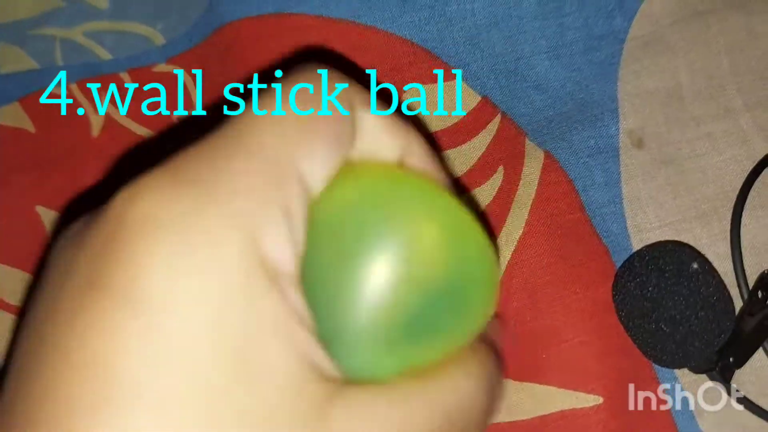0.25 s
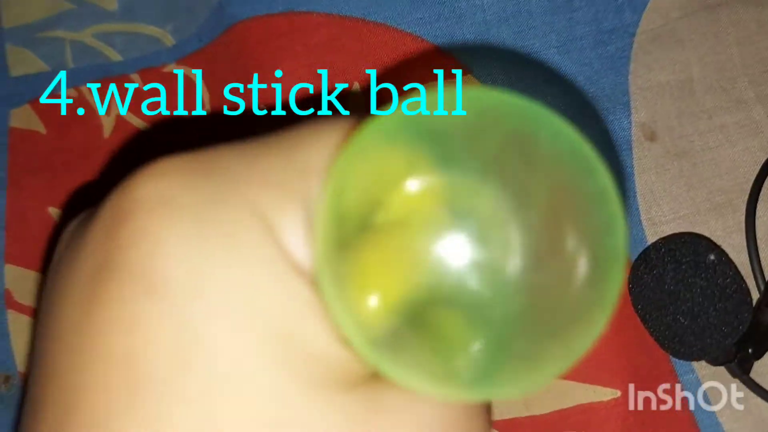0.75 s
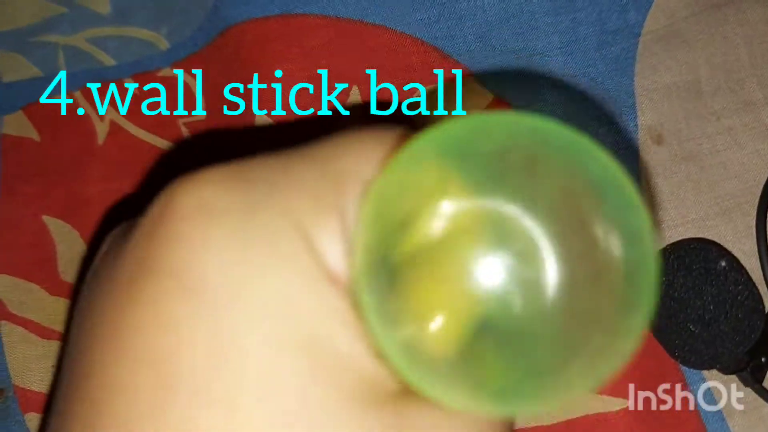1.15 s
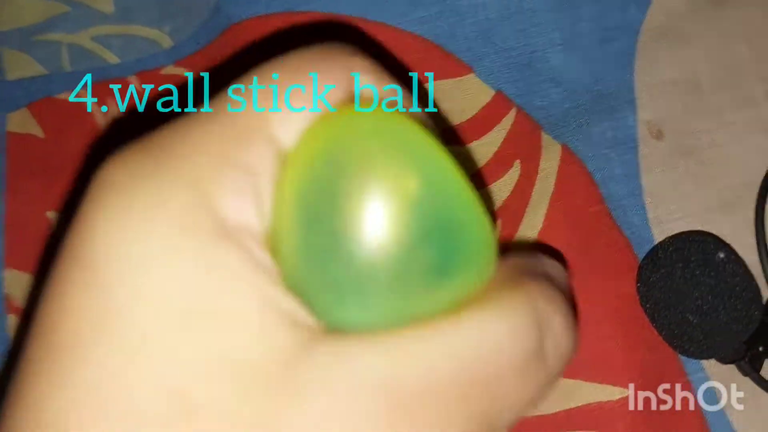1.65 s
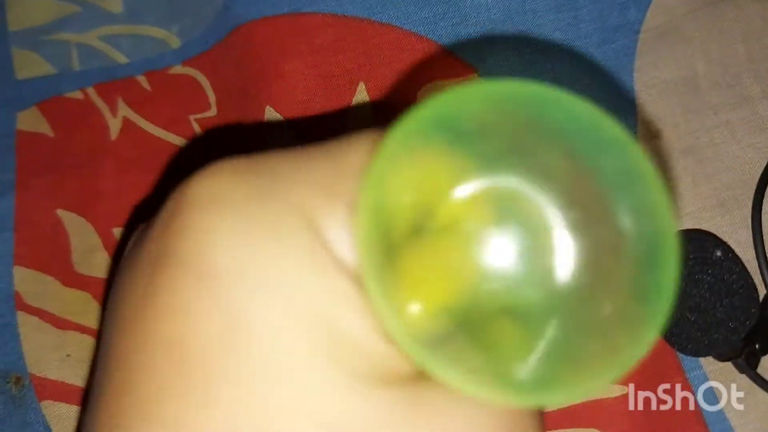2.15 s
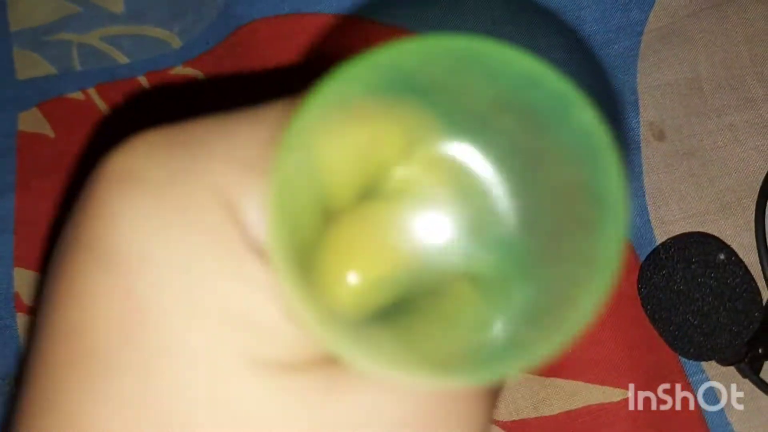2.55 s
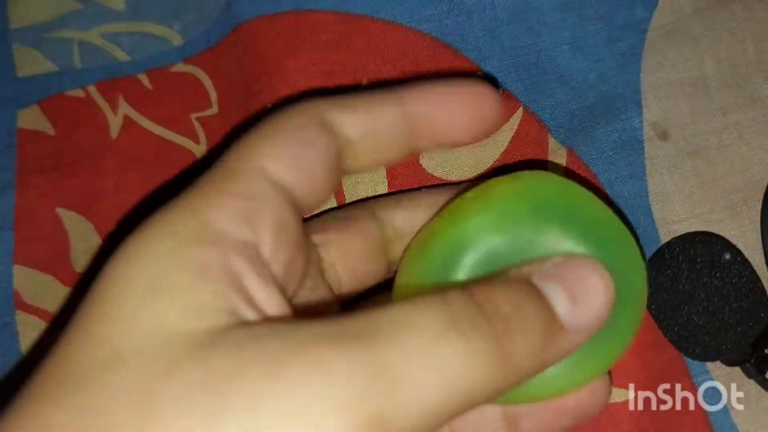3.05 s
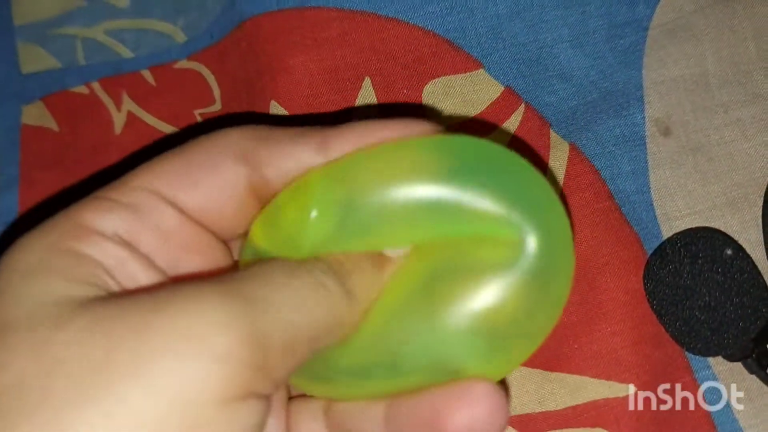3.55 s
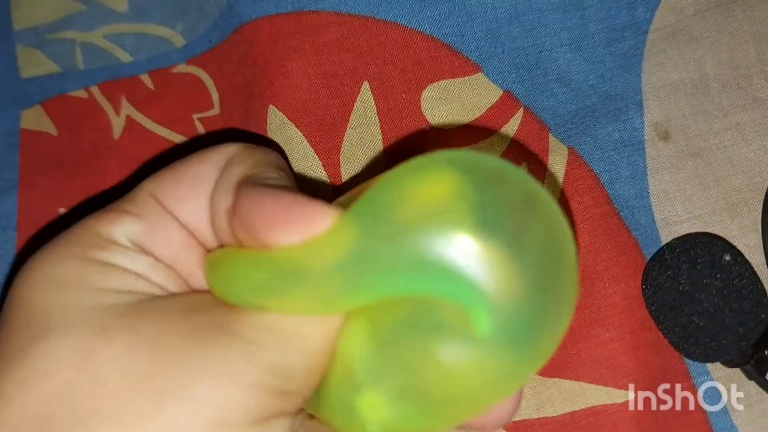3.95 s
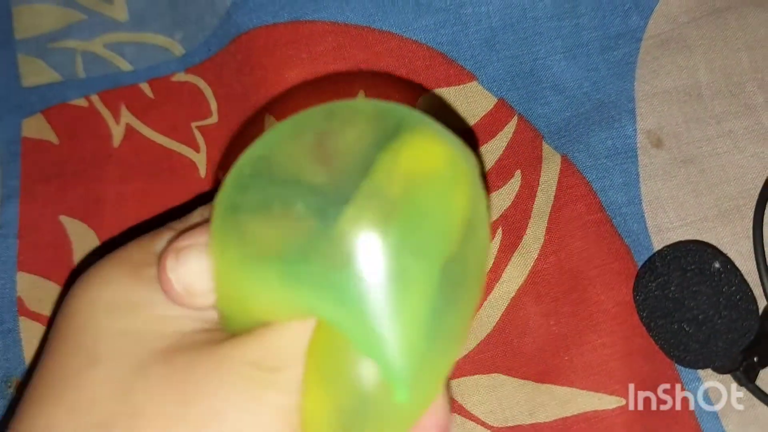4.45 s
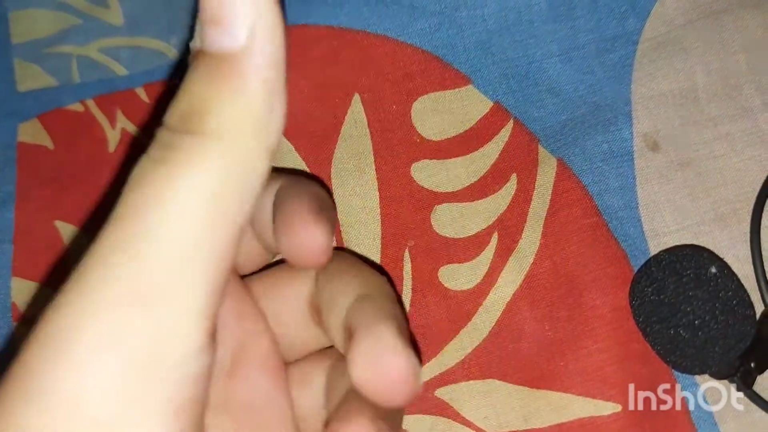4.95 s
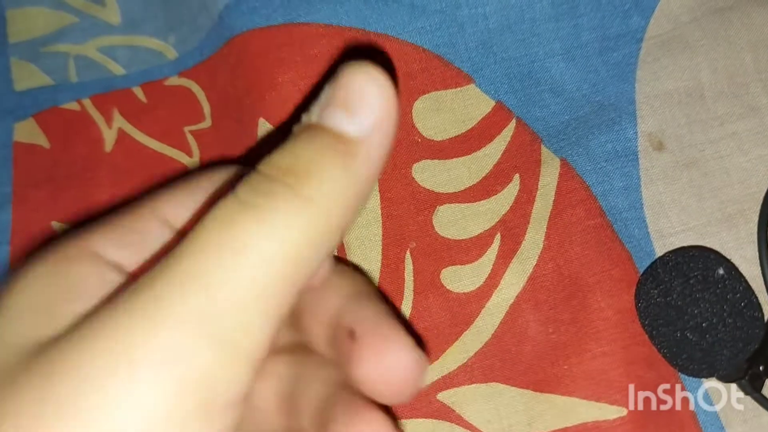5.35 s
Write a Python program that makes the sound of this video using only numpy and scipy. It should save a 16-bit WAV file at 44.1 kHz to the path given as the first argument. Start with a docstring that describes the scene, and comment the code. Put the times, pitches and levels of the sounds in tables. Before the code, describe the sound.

A low, quiet rumble runs throughout, indoors, with a small microphone very close and hardly any echo. From 0 to 2.8 s a fist kneads a sticky gel ball. Rubber brushes and squeals on the palm, loudest around 0.3 to 0.5 s, and tacky skin peels away in tight clusters of sharp snaps with hollow, sinking air pops near 0.3, 0.6, 0.95, 1.34, 1.7, 2.03, 2.36 and 2.72 s. Short high squeaks lead some of them, clearest at 1.66 and 2.01 s, amid fine crackle and squelch. Around 3 s two dull bumps nudge the bed, and a soft low hum swells at 3.5 s. It stays nearly still, with faint sticky ticks at 4.12 and 4.55 s. At 4.87 to 4.9 s the ball hits the sheet with a slap and a boomy thud, then bounces more softly and dully at 5.13 s, leaving only rumble until about 5.6 s.

```python
"""A low rumble and a brush of rubber on the palm open the scene: a fist works a sticky gel ball near a small mic.
Then the tacky skin peels off the fingers in snaps: a jerk rings the skin, a trapped air pocket pops with a sinking tone.
Rubbing is filtered noise, squeals from slips and resonances, and short squeaks, with crackling tack and squelching gel.
Near the end the ball drops on the bed sheet and bounces: soft pushes ring ball and bed, its skin and air slap.
Before that the hand nudges the bed, and a low hum swells once, over shaped noise for the rumble."""
import sys
import numpy as np
from scipy import signal
from scipy.io import wavfile

SR = 44100
rng = np.random.default_rng(int(sys.argv[2]) if len(sys.argv) > 2 else 0)


def unload_wav(signal):
    """Save mono or channel-first audio to the path in sys.argv[1] as 16-bit WAV at rate SR, clipped to [-1, 1]."""
    wavfile.write(
        sys.argv[1],
        SR,
        np.round(np.clip(np.atleast_2d(signal).T, -1, 1) * 32767).astype(np.int16),
    )


N = 246519


def from_db(db):
    """Decibels to amplitude gain."""
    return 10 ** (np.asarray(db) / 20)


def rms_one(x):
    """Scale to unit rms."""
    return x / np.sqrt(np.mean(x ** 2) + 1e-20)


def in_time(rows):
    """Each column of a curve, joined by straight lines, at every sample."""
    times, *columns = np.transpose(rows)
    return [np.interp(np.arange(N) / SR, times, column) for column in columns]


def drift(rate_hz):
    """Slow random wander of rms 1: noise through two equal low-pass poles, made at every 40th sample."""
    pole = np.exp(-80 * np.pi * rate_hz / SR)
    noise = rng.standard_normal(N // 40 + 2002)
    slow = signal.lfilter([1], [1, -2 * pole, pole * pole], noise)[2000:]   # drop the settling
    return np.interp(np.arange(N) / 40, np.arange(len(slow)), rms_one(slow))


def ring(x, hz, t60):
    """Two-pole resonance: a unit click starts a dying sine of height 1; t60 in seconds."""
    radius = from_db(-60 / (max(t60, 5e-4) * SR))
    angle = 2 * np.pi * hz / SR
    # the tiny offset keeps the filter off denormal numbers
    return signal.lfilter([0, np.sin(angle)], [1, -2 * radius * np.cos(angle), radius * radius], x + 1e-18)


def hump(hz, width_hz):
    """A narrow band of noise: twice through one resonance, rms 1."""
    t60 = np.log(1000) / (np.pi * width_hz)
    return rms_one(ring(ring(rng.standard_normal(N), hz, t60), hz, t60))


def passed(x, hz, kind, order=2):
    """Butterworth filter."""
    return signal.sosfilt(signal.butter(order, hz, kind, fs=SR, output="sos"), x)


# Spectrum of the room rumble, relative: f/Hz, level/dB per Hz
RUMBLE_SPECTRUM = [(15, -48.5), (25, -27.5), (54, 0), (77, 0), (100, -8), (180, -5), (299, -2),
                   (333, -11.5), (371, -16), (412, -7.5), (524, -11.5), (1110, -19), (2600, -34),
                   (3140, -52), (14800, -46.5)]
# Narrow humps in the rumble: f/Hz, width/Hz, relative level/dB
RUMBLE_HUMPS = [(62.6, 16.9, -3.5), (257.5, 40, -10), (304.6, 26, -7)]
# Slow swell of the rumble: t/s, rumble level/dB, level of the humps over it/dB
RUMBLE_SWELL = [(0.0, -45, -7), (0.83, -43.5, -9.5), (1.15, -45, -8), (1.52, -43, -8.5), (2.49, -45, -5.5),
                (2.8, -43, -5.5), (3.02, -42.5, 1), (3.21, -44.5, -6), (3.64, -44.5, -3.5),
                (3.95, -44.5, -9), (5.03, -42.5, -10.5), (5.59, -45, -4.5)]


def rumble():
    """Third-octave bands of noise that swell loosely together, plus a few narrow humps."""
    level_db, humps_db = in_time(RUMBLE_SWELL)
    edges = 22 * 2 ** np.arange(0, 9.5, 1 / 3)
    table_hz, table_db = np.array(RUMBLE_SPECTRUM).T
    white = rng.standard_normal((2, N))   # neighbouring bands use different noise
    together = drift(2.7)
    bands = 0
    for k, (low, high) in enumerate(zip(edges, edges[1:])):
        band_db = np.interp(np.log(low * high) / 2, np.log(table_hz), table_db)
        gain = from_db(band_db + 1.1 * together + 1.3 * drift(14))
        bands = bands + gain * passed(white[k % 2], [low, high], "band", order=3)
    humps = sum(from_db(db) * hump(hz, width) for hz, width, db in RUMBLE_HUMPS)
    bands = passed(passed(bands, 26, "high", order=6), 6600, "low", order=3)
    return from_db(level_db) * (rms_one(bands) + from_db(humps_db) * humps)


HUM_MIDDLE_S, HUM_HALF_S, HUM_HZ, HUM_DB = 3.5, 0.08, 180.5, -45


def hum():
    """A narrow low band of noise swells and fades once under a bell curve."""
    t = np.arange(N) / SR
    swell = np.exp(-((t - HUM_MIDDLE_S) / HUM_HALF_S) ** 2)
    return from_db(HUM_DB) * swell * hump(HUM_HZ, 25)


# The ball meets the sheet: t/s, blow level/dB, softness/ms
DROPS = [(4.862, -31.5, 2.3), (4.872, -27, 2.2), (4.881, -14, 2.7), (4.8936, -11.5, 1.33),
         (4.907, -30, 0.66), (4.918, -24.5, 1), (4.934, -33.5, 1), (5.121, -17.5, 5.5), (5.133, -10.5, 10)]
# The hand nudges the bed: t/s, blow level/dB, softness/ms
NUDGES = [(2.966, -18, 9.4), (3.085, -21, 7.5)]
# Modes of ball and bed: f/Hz, level/dB, t60/s
BED_MODES = [(75, -2, 0.034), (139, 0, 0.022), (265.3, -1.5, 0.078), (433, -3, 0.028), (660, 0.5, 0.044),
             (900, -2.5, 0.019)]
SHUDDER_DB, SHUDDER_S = -18, 0.014   # the gel keeps jolting the sheet after each blow


def drops():
    """Soft bell-shaped pushes, each with a dying shudder, ring the modes of ball and bed."""
    push = np.zeros(N)
    t = np.arange(SR // 10) / SR
    blows = DROPS + NUDGES
    dying = np.exp(-t / SHUDDER_S) / np.sqrt(SHUDDER_S * SR)
    jolts = rng.standard_normal((len(blows), len(t))) * dying
    for (s, blow_db, soft_ms), jolt in zip(blows, jolts):
        shape = np.hanning(max(round(soft_ms * SR / 1000), 4))
        blow = np.convolve((t == 0) + from_db(SHUDDER_DB) * jolt, shape / shape.sum())
        push[round(s * SR):][:len(blow)] += from_db(blow_db) * blow
    modes = 0
    for k, (hz, db, t60) in enumerate(BED_MODES):
        modes = modes + from_db(db) * ring(push, hz, t60) * (-1) ** (k + 1)   # alternate polarity
    return passed(modes, 45, "high")


# Strokes of rubber over the palm: start t/s, length/s, hiss level/dB, low squeal level/dB,
# high squeal level/dB, growth over the stroke/dB
STROKES = [(0.0, 0.0014, -57, -61, -59.5, 5), (0.183, 0.053, -78, -77, -74, -2),
           (0.266, 0.051, -56.5, -72, -59, 12), (0.318, 0.039, -53, -53, -69, 3),
           (0.387, 0.055, -49.5, -50.5, -70, 1.5), (0.463, 0.019, -54, -53.5, -70, -1),
           (0.505, .03, -63, -83, -90, -3), (0.581, 0.037, -63, -71.5, -55, 21),
           (0.921, 0.046, -62.5, -66.5, -62, 10), (0.951, 0.071, -61, -65, -74, -8),
           (1.29, 0.042, -73, -78, -65, -6.5), (1.349, 0.044, -61.5, -66.5, -71.5, -4.5),
           (1.094, 0.027, -89.5, -84, -75.5, 0), (1.417, 0.062, -79, -73, -81, -15),
           (1.675, 0.052, -66.5, -64, -64, 14), (2.011, .007, -64, -85, -61, 7),
           (2.035, 0.019, -60, -64, -55.5, 18), (2.339, 0.038, -64, -67, -62.5, 17),
           (2.404, 0.034, -62, -72, -67.5, -11.5), (2.716, 0.026, -59.5, -68, -58.5, 15.5),
           (2.776, 0.036, -63, -68, -67.5, 4), (2.924, 0.051, -61, -72.5, -69, -3),
           (4.116, 0.021, -68, -91.5, -80.5, 6), (4.135, 0.07, -77, -88, -79.5, 2),
           (4.228, 0.043, -81, -82, -83.5, -1.5), (4.548, .02, -77, -67.5, -83, -3.5),
           (4.877, 0.018, -57, -61, -56.5, 14)]
# The triples below are for hiss, low squeal, high squeal
GROWTH_SHARE = (0.65, 0.4, 0.048)   # how far each follows the growth
RISE_DB_PER_S, FALL_DB_PER_S = (527, 471, 559), (479, 415.5, 693.5)
REST_DB = (-94, -94, -96.5)   # the hand at rest
LINGER_DB, LINGER_DB_PER_S = -15, 110   # a weaker, slower tail


def strokes():
    """Levels in dB of hiss, low and high squeal: each stroke rises, holds while it changes, falls and lingers."""
    t = np.arange(0, N + 32, 32) / SR
    levels = []
    for k in range(3):
        power = from_db(REST_DB[k]) ** 2
        for start, length, *db, growth_db in STROKES:
            early = np.maximum(start - t, 0)
            past = np.maximum(t - start - length, 0)
            held = db[k] + GROWTH_SHARE[k] * growth_db * np.clip((t - start) / length, 0, 1)
            fall = np.maximum(-FALL_DB_PER_S[k] * past, LINGER_DB - LINGER_DB_PER_S * past)
            power = power + from_db(held + fall - RISE_DB_PER_S[k] * early) ** 2
        levels.append(np.interp(np.arange(N) / SR, t, 10 * np.log10(power)))
    return levels


SLIPS_PER_S, SLIP_SPREAD, SLIP_NOISE_DB = 170, .25, -9   # typical rate, its log spread, noise under the slips


def creak(pitches_hz, width_hz):
    """Rubber sticks and slips unevenly; each slip rings one of a few broad resonances over noise; rms 1."""
    rate = SLIPS_PER_S * np.exp(SLIP_SPREAD * drift(60))
    count = np.floor(np.cumsum(rate) / SR)
    slips = np.diff(count, prepend=0) * from_db(3 * rng.standard_normal(N))
    t60 = np.log(1000) / (np.pi * width_hz)
    dealt = rng.integers(0, len(pitches_hz), N)
    rings = sum(ring(ring(slips * (dealt == k), hz, t60), hz, t60) for k, hz in enumerate(pitches_hz))
    noise = hump(np.mean(pitches_hz), width_hz)
    return rms_one(rms_one(rings) + from_db(SLIP_NOISE_DB) * noise)


CRACKLE_PER_S = 740


def crackle():
    """Tiny patches of tack tear at random, each ringing a few cycles; rms 1."""
    sizes = from_db(4 * np.minimum(rng.exponential(1, N), 3)) * rng.choice([-1, 1], N)
    torn = rng.random(N) < CRACKLE_PER_S / SR
    dealt = rng.integers(0, 12, N)
    pitches = np.geomspace(500, 4500, 12)
    rings = sum(ring(sizes * torn * (dealt == k), hz, 6.0 / hz) for k, hz in enumerate(pitches))
    return rms_one(passed(rings, 5100, "low"))


# Short squeaks as the fist starts to open: peak t/s, level/dB, f/Hz
SQUEAKS = [(0.893, -57, 4870), (1.663, -44.5, 5050), (2.011, -47.5, 5200), (2.327, -67, 4960)]
SQUEAK_RISE_DB_PER_S, SQUEAK_FALL_DB_PER_S, SQUEAK_WIDTH_HZ = 1150, 1807.5, 550


def squeaks():
    """Narrow bands of noise with a quick rise and a quicker end."""
    t = np.arange(N) / SR
    out = 0
    for s, db, hz in SQUEAKS:
        rise = SQUEAK_RISE_DB_PER_S * np.maximum(s - t, 0)
        fall = SQUEAK_FALL_DB_PER_S * np.maximum(t - s, 0)
        out = out + from_db(db - rise - fall) * hump(hz, SQUEAK_WIDTH_HZ)
    return out


HISS_LOW_HZ, HISS_HIGH_HZ = 1800, 12600
LOW_SQUEAL_HZ, LOW_SQUEAL_WIDTH_HZ = (3300, 3600, 4050), 750   # pitches a slip may ring at
OVERTONE_HZ, OVERTONE_WIDTH_HZ = 6300, 800
HIGH_SQUEAL = [(5000, 1000), (5800, 1100)]   # f/Hz, width/Hz; each wanders in level on its own
SQUEAL_WANDER_DB, FLUTTER_DB = 3, 2
CRACKLE_DB, SQUELCH_DB = 12.5, 18.5   # over the weaker of the two squeals


def rub():
    """Rubber hisses on skin with two loose, fluttering squeals; tack crackles and gel squelches."""
    hiss_db, low_db, high_db = strokes()

    grains = rng.standard_normal(N) * from_db(2.5 * rng.exponential(1, N))
    hiss = passed(passed(grains, HISS_LOW_HZ, "high"), HISS_HIGH_HZ, "low", order=16)
    hiss = rms_one(passed(hiss, 14000, "low", order=1))
    hiss = from_db(hiss_db - 0.5 * drift(60)) * hiss

    overtone = from_db(-7.0) * hump(OVERTONE_HZ, OVERTONE_WIDTH_HZ)
    low = creak(LOW_SQUEAL_HZ, LOW_SQUEAL_WIDTH_HZ) + overtone
    low = from_db(low_db + FLUTTER_DB * drift(150)) * low

    high = sum(from_db(SQUEAL_WANDER_DB * drift(4.8)) * hump(hz, width) for hz, width in HIGH_SQUEAL)
    high = from_db(high_db + 2.3 * drift(120)) * rms_one(high)

    working = from_db(np.minimum(low_db, high_db))   # both squeals are up while the fist works the ball
    squelch = rms_one(passed(rng.standard_normal(N), [100, 900], "band"))
    squelch = from_db(SQUELCH_DB + 3.0 * drift(32)) * squelch
    tack = from_db(CRACKLE_DB) * crackle()
    return hiss + low + high + squeaks() + working * (tack + squelch)


POCKET_SAG, POCKET_SAG_S = 0.31, .0006   # starts higher by this share, sinks with this time constant
POCKET_ROUGH = 0.33   # depth of the waver in level


def pocket(hz, t60, wobble):
    """A trapped air pocket: a dying tone that sinks in pitch and wavers."""
    t = np.arange(len(wobble)) / SR
    sag = POCKET_SAG * np.exp(-t / POCKET_SAG_S)
    pitch = hz * (1 + sag + 0.092 * POCKET_ROUGH * wobble[::-1])
    tone = np.sin(2 * np.pi * np.cumsum(pitch) / SR) * (1 + POCKET_ROUGH * wobble)
    return passed(tone * from_db(-60 * t / t60), 300, "high")


# Skin snapping off the fingers, and at 4.86 to 4.9 s the ball's skin and air slapping the sheet:
# t/s, pocket f/Hz, pocket level/dB, pocket t60/ms, skin f/Hz, skin level/dB, upper skin ring level/dB,
# treble tick level/dB, top tick level/dB (peaks before the last filters)
SNAPS = [(0.2685, 605, -46, 18, 2700, -42, -37, -50, -56),
         (0.285, 1300, -36, 30, 2420, -41, -23.5, -27, -28),
         (0.297, 1150, -26.5, 14, 3330, -44, -39, -41, -47),
         (0.311, 730, -19, 10.5, 2900, -19, -40, -13, -13),
         (0.5727, 620, -52, 17, 2250, -34, -31, -41, -54),
         (0.5822, 1450, -41, 27, 2630, -35.5, -24, -35, -50),
         (0.6024, 1100, -27, 10, 2700, -45, -55, -63, -66),
         (0.614, 720, -15.5, 11, 2990, -5.5, -8, -13.5, -30),
         (0.6233, 650, -25.5, 22, 3000, -45, -48, -58, -69),
         (0.8924, 970, -53.5, 12, 2050, -35, -44, -66.5, -74),
         (0.9083, 1150, -39, 18, 2550, -32, -33, -54, -52),
         (0.9177, 1530, -39, 29, 2350, -48, -37, -54, -60),
         (0.9202, 1190, -46, 10, 2800, -47, -43, -45, -52.5),
         (0.9278, 1216, -30.5, 42, 2900, -39, -40, -38, -49),
         (0.952, 844, -17, 15, 3220, -7, -21, -10.5, -15),
         (0.962, 660, -28.5, 25, 3270, -40, -47, -47, -49.5),
         (1.331, 1020, -16.5, 11, 2500, -31, -36, -64, -68),
         (1.3394, 810, -51, 10, 2700, -37, -32, -59, -60),
         (1.3445, 734, -13, 11.7, 2940, -8.5, -12, -35, -28),
         (1.354, 684, -31, 38, 2420, -55, -60, -64, -64),
         (1.677, 1610, -36, 21, 2400, -30.5, -33.5, -36, -46),
         (1.681, 734, -39, 16, 2180, -26.5, -26.5, -38, -55),
         (1.688, 1240, -33.5, 36, 3000, -39, -59, -58, -62),
         (1.6961, 1150, -22, 29, 1980, -29, -42, -58, -62),
         (1.7179, 877, -23, 22, 2920, -14, -30.5, -32.5, -55),
         (2.011, 1560, -38, 22, 2330, -46, -34, -49, -49),
         (2.0194, 900, -55, 10, 2250, -52, -21.5, -30, -28),
         (2.0213, 1420, -26, 16, 2850, -24, -13, -16, -11),
         (2.0227, 1600, -47, 10, 3300, -45, -20, -30, -28),
         (2.029, 1080, -28, 19, 2200, -40, -47, -55, -59),
         (2.0515, 654, -13, 17, 2500, -12, -24.5, -24.5, -34),
         (2.3295, 900, -44, 13, 2270, -41, -38, -59, -67),
         (2.3497, 1240, -31.5, 44, 2010, -43, -53.5, -57, -62),
         (2.359, 900, -32.5, 39, 2550, -43, -37, -56, -62),
         (2.3695, 757, -22, 14, 3200, -19, -33, -33, -48),
         (2.3752, 703, -24.5, 49, 2480, -48, -37, -53, -56),
         (2.6835, 603, -62, 18, 1880, -33.5, -61, -71, -74),
         (2.696, 1200, -47.5, 18, 2240, -30.5, -41, -54, -65),
         (2.7033, 1380, -35, 22, 2400, -49, -38, -47, -58.5),
         (2.7221, 1090, -26, 23, 2300, -45, -48, -54, -63),
         (2.7351, 780, -34, 21, 3470, -32, -46, -46, -52),
         (2.7405, 640, -23.5, 23, 2000, -33, -40, -47, -48),
         (2.8184, 650, -34, 31, 1990, -53, -56, -53, -60),
         (4.116, 2070, -51, 13, 2350, -66.5, -61, -57.5, -54),
         (4.135, 1450, -40, 27, 2480, -72, -49.5, -48, -43.5),
         (4.5438, 1900, -47.5, 11, 2100, -42.5, -48, -61.5, -67),
         (4.5477, 1530, -34, 14, 1800, -26.5, -37, -53.5, -63),
         (4.866, 1096, -26.5, 68, 1690, -42, -63, -65.5, -67),
         (4.8827, 853, -14.5, 28, 1900, -22, -29, -33, -45),
         (4.8937, 900, -21, 10, 1930, -24, -25.5, -28, -26)]
LOW_T60_S, HIGH_T60_S, TICK_T60_S = 0.0016, 0.0015, 0.0011
UPPER_RING_RATIO, TICKS_HZ = 2.2, (8290, 11250)
SNAP_LOW_HZ, SNAP_TOP_HZ = 400, 11400


def snaps():
    """Skin peeling off, or at the drop slapping the sheet: a jerk and weaker slips ring skin and air pocket."""
    size = 2048
    out = np.zeros(N + size)
    dying = np.exp(-np.arange(size) / (.0009 * SR)) * .12
    slips = rng.standard_normal((len(SNAPS), size)) * dying
    wobbles = rms_one(passed(rng.standard_normal((len(SNAPS), size)), 400, "low"))
    for (s, hz, pocket_db, t60_ms, skin_hz, *skin_db), slip, wobble in zip(SNAPS, slips, wobbles):
        jerk = slip - (np.arange(size) == 0)
        skin = [(skin_hz, LOW_T60_S), (UPPER_RING_RATIO * skin_hz, HIGH_T60_S)]
        skin += [(tick_hz, TICK_T60_S) for tick_hz in TICKS_HZ]
        rings = [pocket(hz, t60_ms / 1000, wobble)]
        rings += [ring(ring(jerk, f, t60), f, t60) for f, t60 in skin]   # twice: steep flanks
        rings[1] = passed(rings[1], 8000, "low")
        gains = from_db([pocket_db, *skin_db])
        snap = sum(gain * part / np.abs(part).max() for gain, part in zip(gains, rings))
        out[round(s * SR):][:size] += snap
    return passed(passed(out[:N], SNAP_LOW_HZ, "high", order=3), SNAP_TOP_HZ, "low", order=4)


ECHO_T60_S, ECHO_DB = .05, -46


def echo(x):
    """Sheet, hand and walls return a faint, quickly dying wash of noise-like reflections."""
    t = np.arange(SR // 4) / SR
    tail = rng.standard_normal(len(t)) * from_db(-60 * t / ECHO_T60_S + ECHO_DB) * (t > .002)
    return signal.fftconvolve(x, tail)[:N]


# Bands of the snaps and rubbing cancelled by an echo off the near sheet: f/Hz, width/Hz, share cancelled
SHEET_NOTCHES = [(4600, 530, 0.21), (7500, 130, 0.52), (9200, 170, .4)]


def near_sheet(x):
    """An echo off the sheet cancels narrow bands: part of each resonant band is subtracted."""
    for hz, width_hz, share in SHEET_NOTCHES:
        r = np.exp(-np.pi * width_hz / SR)
        poles = [1, -2 * r * np.cos(2 * np.pi * hz / SR), r * r]
        band = signal.lfilter([(1 - r * r) / 2, 0, (r * r - 1) / 2], poles, x)
        x = x - np.clip(share, 0, 1) * band
    return x


SPREAD_DB, SPREAD_HZ, SIDE_HISS_DB = -29, 4500, -81   # levels before the side filters


def scene():
    """All sources at one microphone; only the treble differs slightly between left and right."""
    snapping = snaps()
    mid = near_sheet(snapping + echo(snapping) + rub()) + drops() + rumble() + hum()
    smear = rms_one(rng.standard_normal(64)) / 8   # unit energy
    unlike = from_db(SPREAD_DB) * np.convolve(mid, smear)[:N]
    unlike = unlike + from_db(SIDE_HISS_DB) * rng.standard_normal(N)
    side = passed(passed(unlike, SPREAD_HZ, "high", order=4), 13500, "low")
    return np.array([mid + side, mid - side])


CUTOFF_HZ = 15900


def record(dry):
    """Peaks beyond the limit are clipped flat, then the treble is cut steeply."""
    held = np.clip(dry, -.96, .96)
    return signal.sosfilt(signal.cheby2(12, 70, CUTOFF_HZ, fs=SR, output="sos"), held)


dry = scene()
out = record(dry)
unload_wav(out)
```